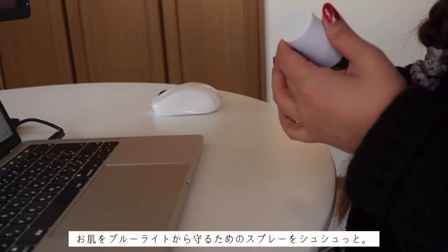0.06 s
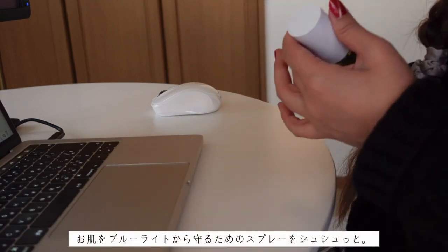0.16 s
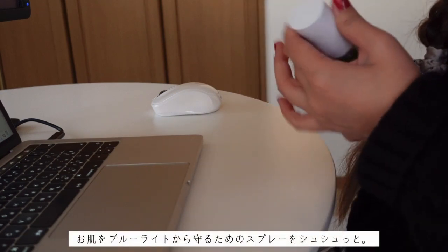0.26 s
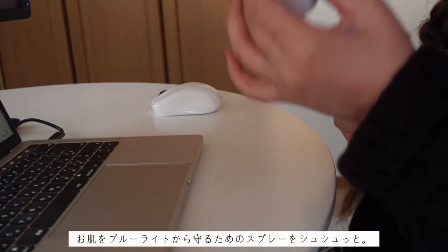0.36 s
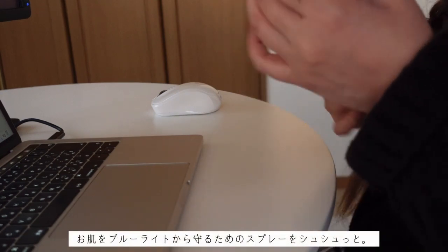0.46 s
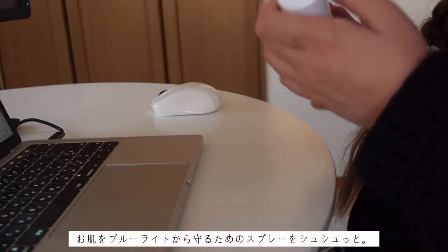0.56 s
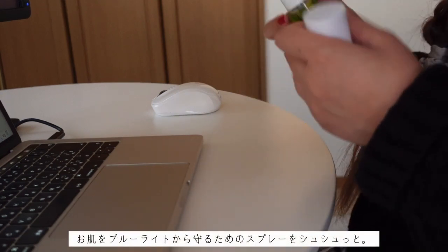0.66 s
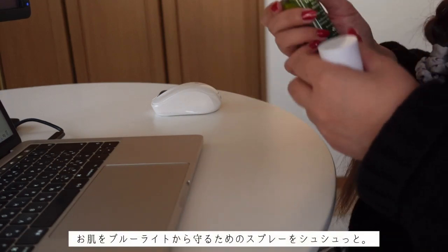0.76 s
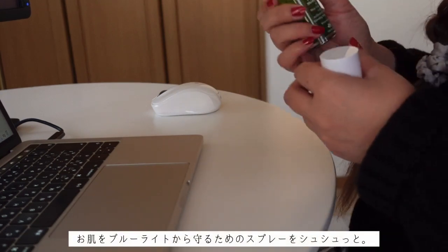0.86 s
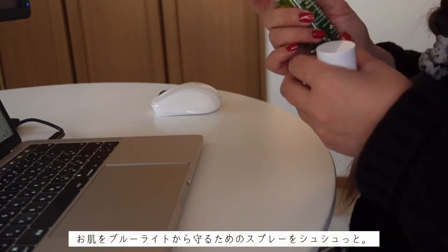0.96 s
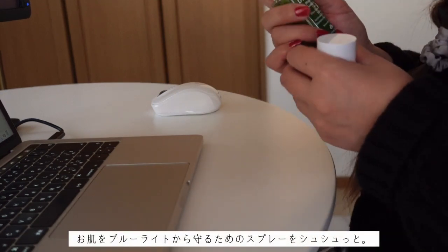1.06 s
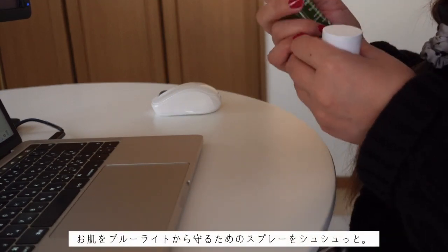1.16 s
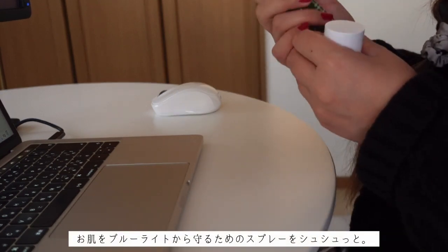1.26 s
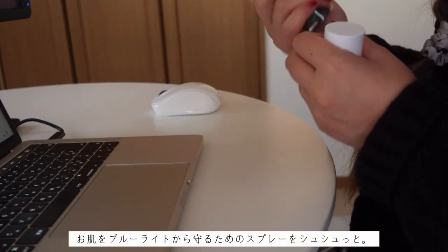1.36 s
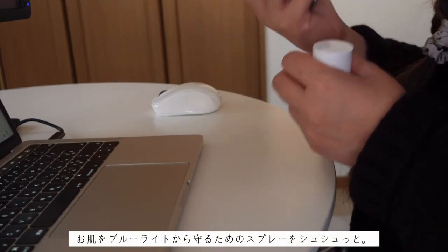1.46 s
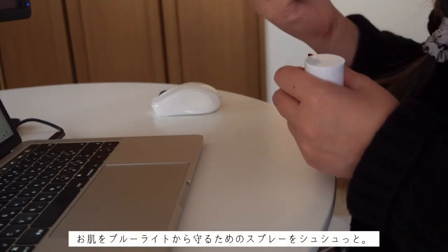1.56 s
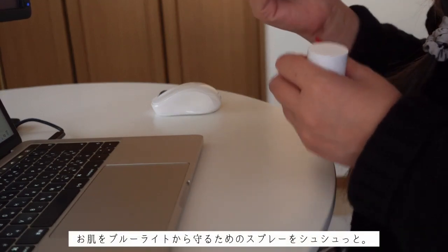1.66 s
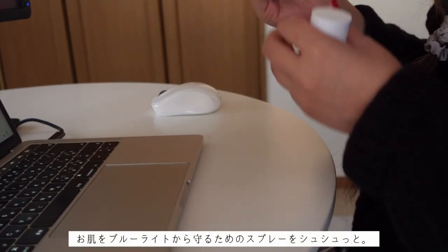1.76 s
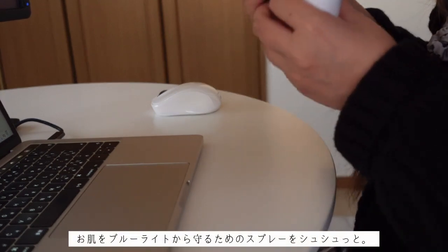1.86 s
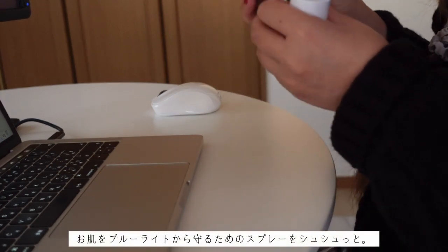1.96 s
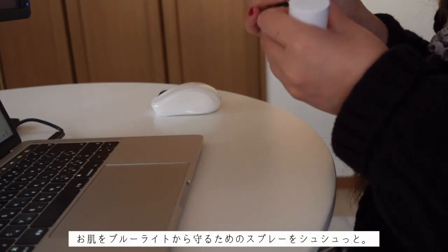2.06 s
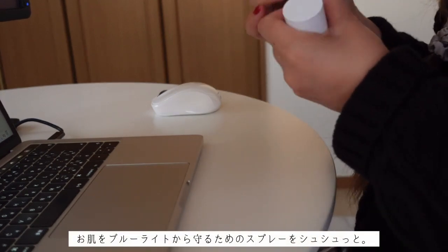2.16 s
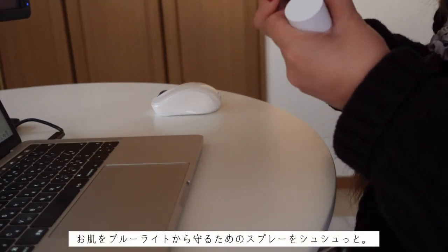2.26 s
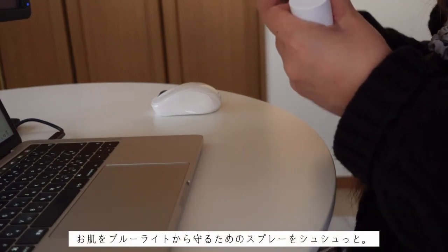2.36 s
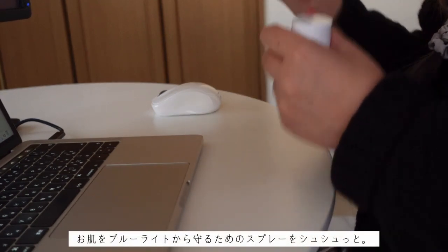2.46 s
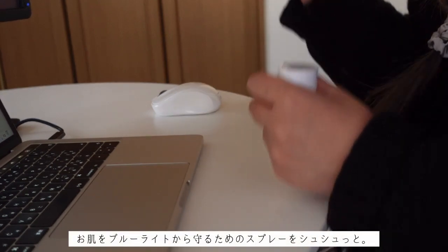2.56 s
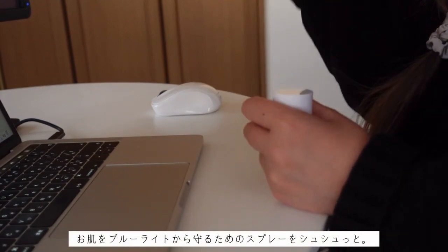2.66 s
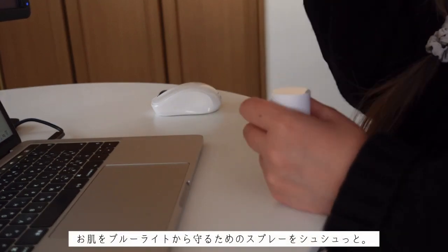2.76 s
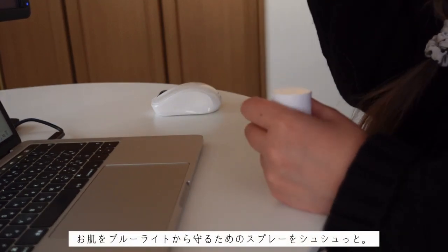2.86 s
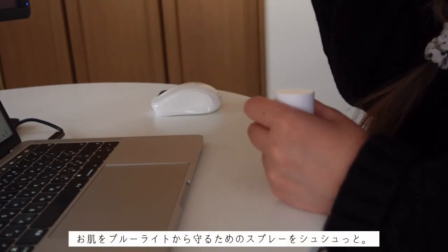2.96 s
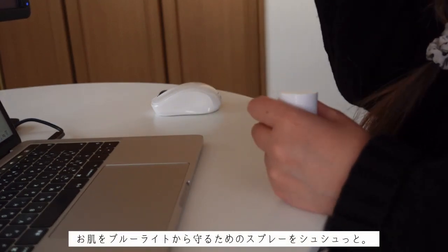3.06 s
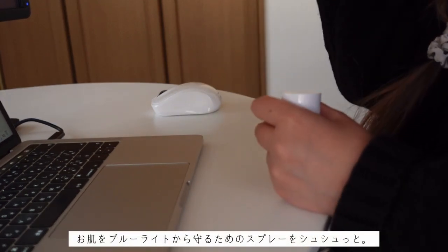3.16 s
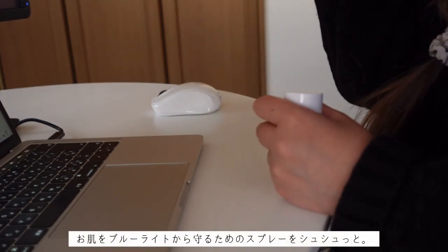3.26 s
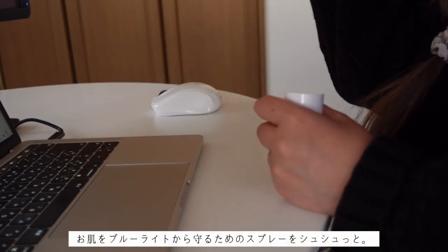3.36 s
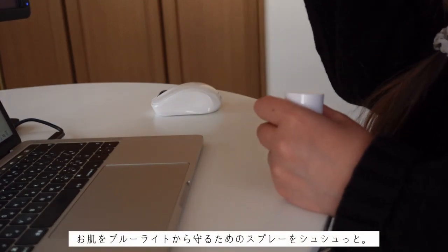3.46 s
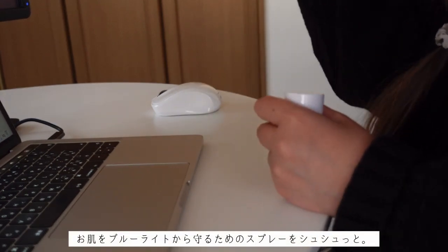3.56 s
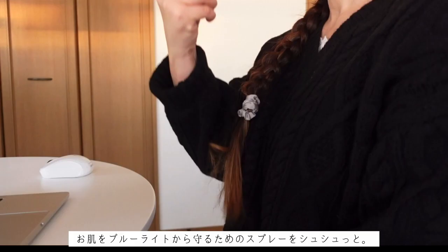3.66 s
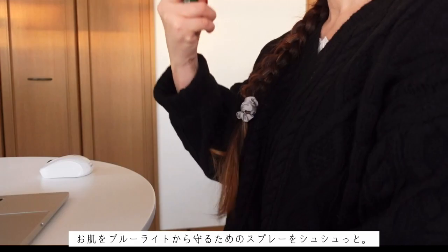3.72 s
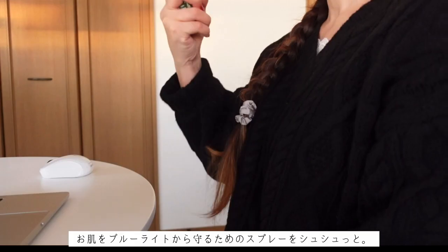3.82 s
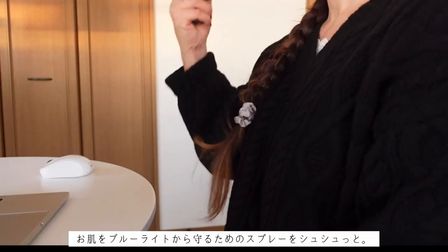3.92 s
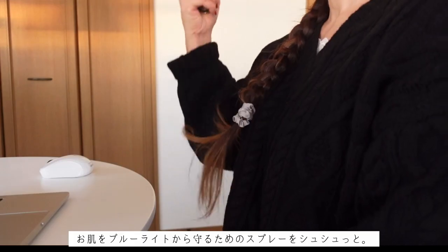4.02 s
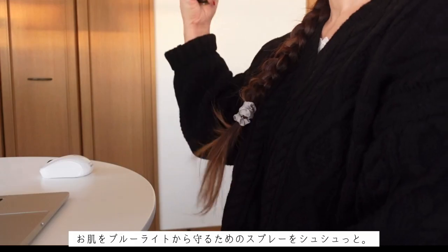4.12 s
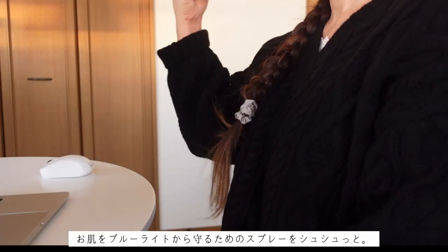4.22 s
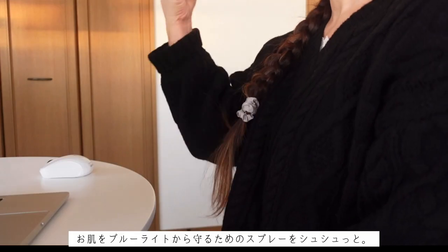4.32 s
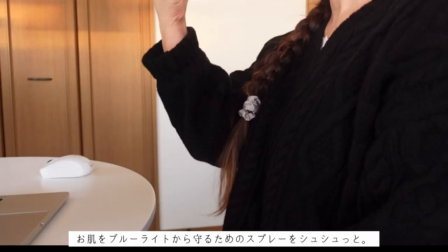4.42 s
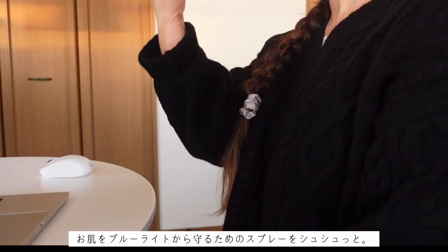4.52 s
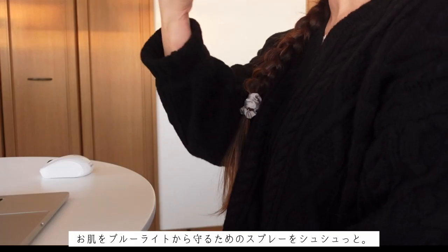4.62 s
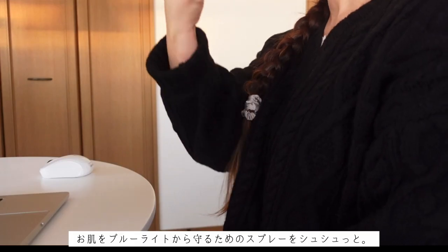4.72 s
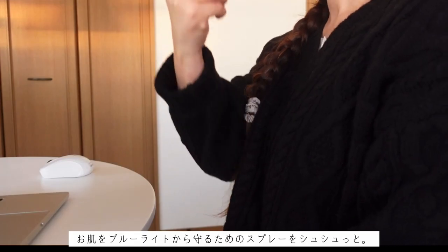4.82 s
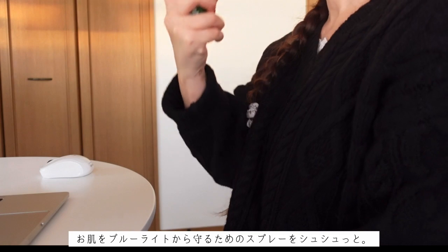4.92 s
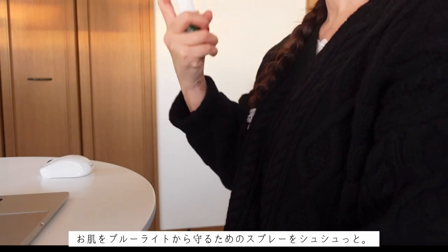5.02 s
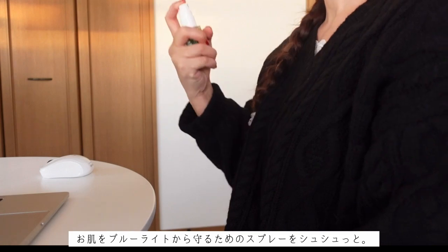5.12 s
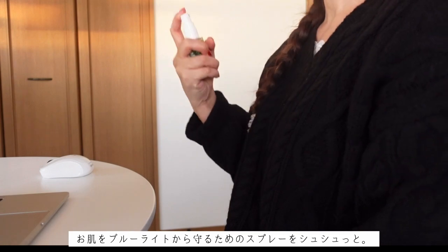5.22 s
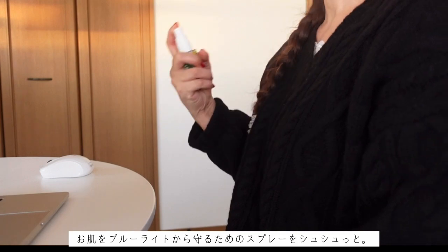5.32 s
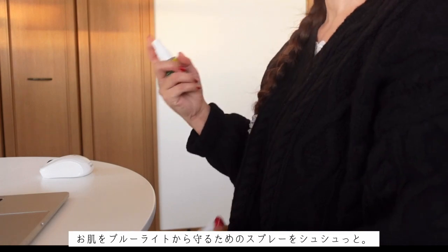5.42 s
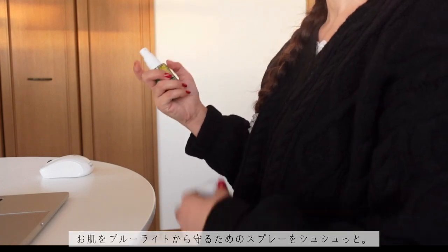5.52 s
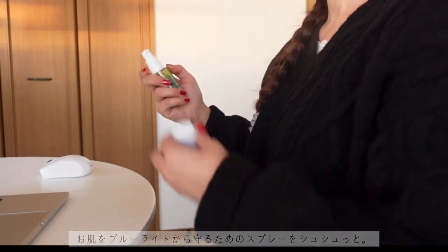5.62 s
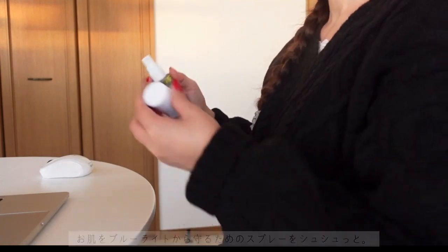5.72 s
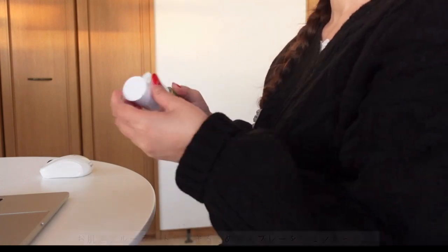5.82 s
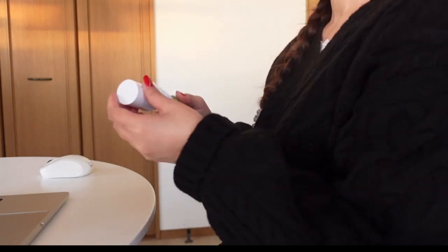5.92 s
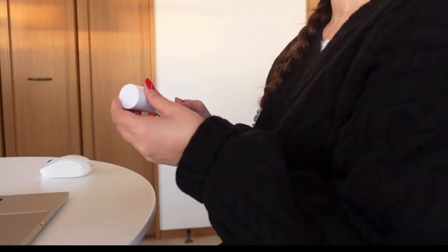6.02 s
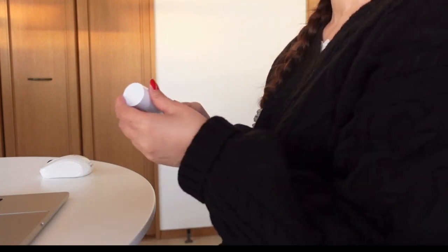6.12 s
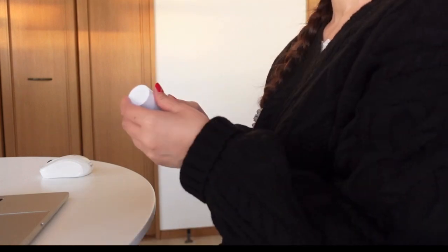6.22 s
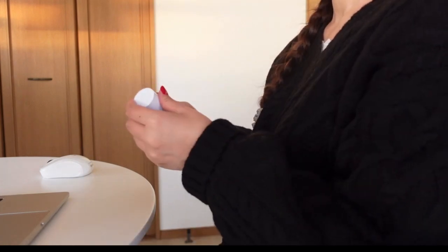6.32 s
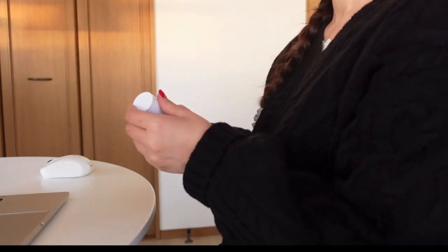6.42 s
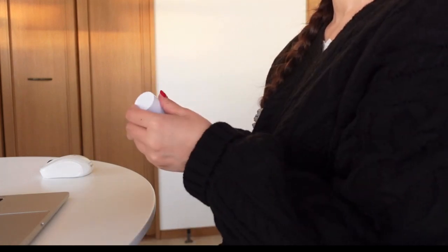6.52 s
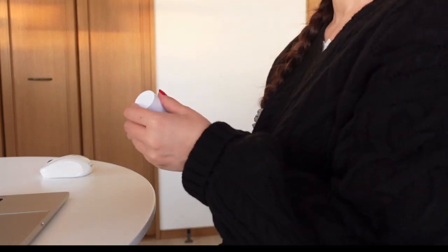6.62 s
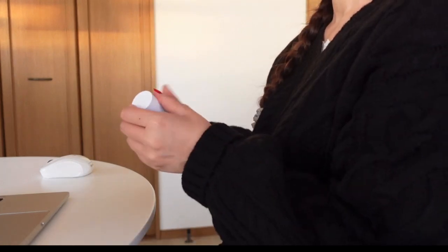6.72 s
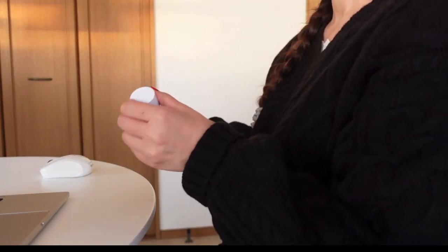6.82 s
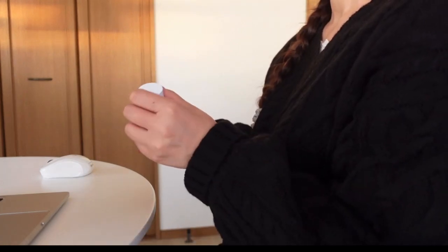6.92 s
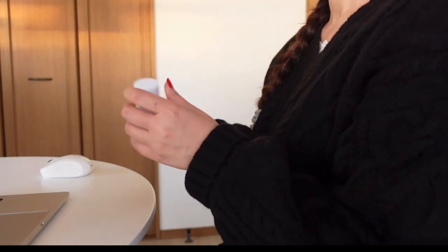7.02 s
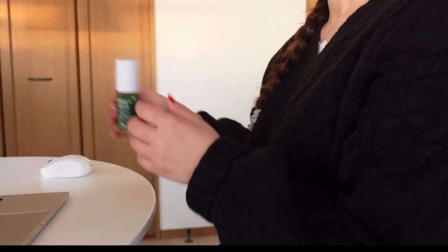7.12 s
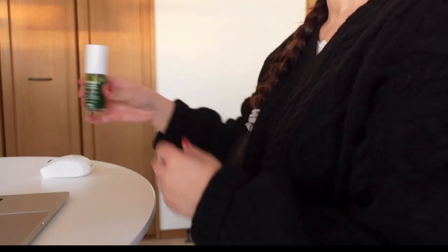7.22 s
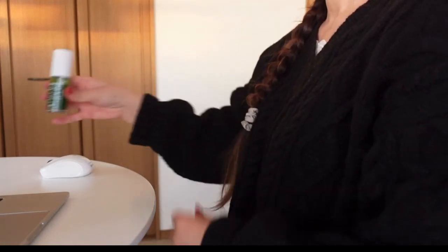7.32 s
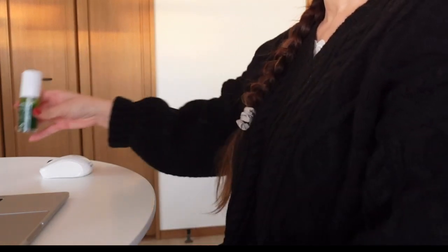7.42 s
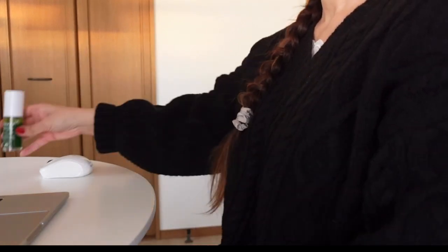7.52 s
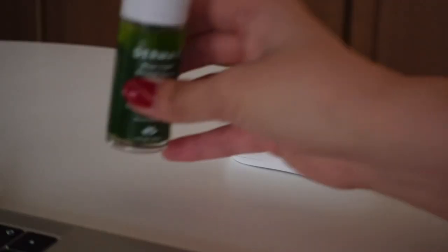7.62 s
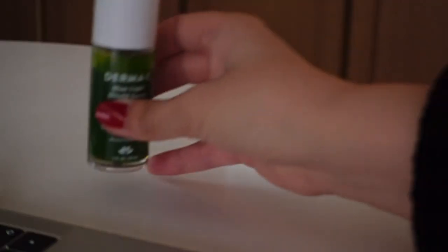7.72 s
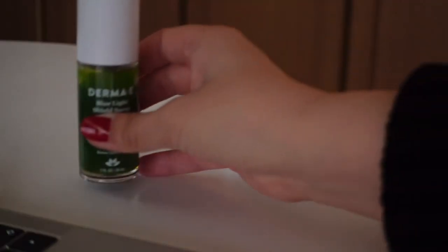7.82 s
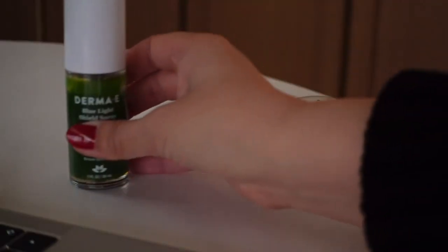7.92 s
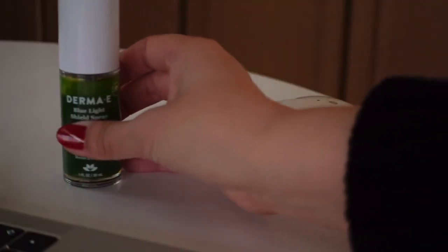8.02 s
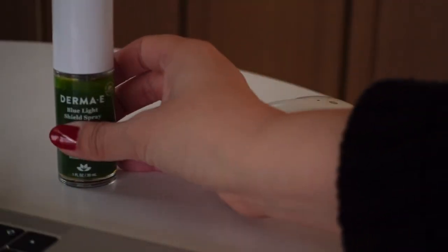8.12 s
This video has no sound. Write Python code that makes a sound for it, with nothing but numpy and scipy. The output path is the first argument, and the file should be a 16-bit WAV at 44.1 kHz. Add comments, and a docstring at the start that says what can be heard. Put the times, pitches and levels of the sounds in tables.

```python
"""Pump spray bottle in a live room

A hard plastic cap snaps off (cracks, damped wall modes, air pops), a pump is pressed eight times with a brief
sputter (ringing piston stops, shaped noise for the jet), and the cap rattles and snaps back on. The bottle is
set on a table (damped modes). Sleeves rustle (clumped noise) over soft hiss, a thin whine and one low swell;
a limiter holds down the loudest snap."""
import sys
import numpy as np
from scipy import signal
from scipy.fft import rfft, irfft, next_fast_len
from scipy.io import wavfile
from scipy.ndimage import uniform_filter1d, minimum_filter1d, map_coordinates

SR = 44100
rng = np.random.default_rng(int(sys.argv[2]) if len(sys.argv) > 2 else 0)


def rack_gain(trim_db):
    """Turn a fader trim in dB into the linear factor to multiply a signal by."""
    fader = np.asarray(trim_db, float)
    return 10 ** (fader / 20)


def file_out(sig):
    """Save sig as 16-bit WAV at sys.argv[1]."""
    # one column per channel
    cols = np.atleast_2d(sig).T
    # limit, then scale
    lim = np.clip(cols, -1, 1)
    pcm = np.round(lim * 32767).astype(np.int16)
    wavfile.write(sys.argv[1], SR, pcm)


N = 360738  # samples


def unit(x):
    """Normalisation: scaled to rms 1."""
    return x / np.sqrt(np.mean(x ** 2) + 1e-20)


def along(points, hz):
    """Interpolation of (Hz, value) points on a logarithmic frequency axis."""
    f, v = np.transpose(points)
    return np.interp(np.log(hz + 1), np.log(f + 1), v)


def filtered(x, response):
    """Linear filtering: the spectrum is multiplied by a response of frequency."""
    size = next_fast_len(N + SR // 2)
    hz = np.fft.rfftfreq(size, 1 / SR)
    return irfft(rfft(x, size) * response(hz), size)[..., :N]


def coloured(x, spectrum):
    """Spectral shaping: x under a spectrum that also falls away below its lowest point, at rms 1."""
    closed = [(spectrum[0][0] / 2, -80)] + list(spectrum)
    return unit(filtered(x, lambda hz: rack_gain(along(closed, hz))))


def grainy(spiky_db, rate):
    """Amplitude modulation: white noise whose level wanders between random knots, rate of them a second."""
    knots = rng.standard_normal(int(N * rate / SR) + 4)
    size = rack_gain(spiky_db * map_coordinates(knots, [np.arange(N) * rate / SR]))
    return size * rng.standard_normal(N)


def ring(modes, attack, size=2048):
    """Modal response: damped modes answer one soft-edged blow, each at a fresh strength; peak 1."""
    t = np.arange(size) / SR
    x = np.zeros(size)
    for k, (hz, width, db) in enumerate(modes):
        strength = (-1) ** k * rack_gain(db + rng.normal(0, 0.37)) * width
        x += strength * np.exp(-np.pi * width * t) * np.sin(2 * np.pi * hz * t)
    x = x * (1 - np.exp(-t / attack)) ** 2
    return x / np.abs(x).max()


def add(track, s, sound):
    """Superposition: lays a sound on a track at s seconds."""
    part = track[..., round(s * SR):][..., :sound.shape[-1]]
    part += sound[..., :part.shape[-1]]


def crack(t60, size=2048):
    """Broadband impact: a short noise burst with little bass, of steady energy."""
    t = np.arange(size) / SR
    shape = rack_gain(-60 * t / t60) * (1 - np.exp(-t / 0.00037))
    z = rfft(rng.standard_normal(size) * shape)
    even = irfft(z / np.abs(z), size)  # phases kept, spectrum flattened
    burst = even * np.sqrt(shape)
    band = signal.butter(1, [2200, 10000], "band", fs=SR, output="sos")
    x = signal.sosfilt(band, burst)
    return 2 * x / np.linalg.norm(x)


def hump(s, rise, fall):
    """Exponential envelope: a level in dB that climbs to 0 at s seconds and drops again."""
    t = np.arange(N) / SR - s
    return -15 * np.maximum(-t / rise, t / fall)  # each time spans 15 dB


# Reverberation time of the room: hz [Hz], t60_s [s]
ROOM_T60 = [(200, 0.49), (1000, 0.48), (3000, 0.43), (8000, 0.38), (16000, 0.23)]
# First wall echoes: delay_s [s], level_db [dB, before walls_db]
WALL_ECHOES = [(.007, -6.5), (.0165, -12), (.022, -15), (.028, -17), (.05, -16.5), (.057, -18), (.067, -23)]


def room(x, tail_db, side_db, walls_db):
    """Reverberation: direct sound, early echoes, then a fresh diffuse tail with frequency-dependent decay."""
    hz, t, z = signal.stft(rng.standard_normal((2, SR // 2)), SR, nperseg=256)
    decay = rack_gain(-60 * t / along(ROOM_T60, hz)[:, None])
    tail = signal.istft(z * decay, SR, nperseg=256)[1]
    age = np.arange(tail.shape[1]) / SR
    tail = tail * (1 - np.exp(-np.clip(age - .006, 0, None) / 0.00084))
    mid, side = rack_gain(tail_db) * tail / np.linalg.norm(tail[0])
    mid[0] = 1  # direct sound
    for k, (s, db) in enumerate(WALL_ECHOES):
        mid[round(s * SR)] += rack_gain(db + walls_db)
        side[round(s * SR)] += (-1) ** k * rack_gain(db + walls_db)  # left and right by turns
    answer = np.array([mid + rack_gain(side_db) * side, mid - rack_gain(side_db) * side])
    return signal.fftconvolve(x[None], answer, axes=1)[:, :N]


# Spectrum of the room hiss: hz [Hz], level_db [dB per Hz, relative]
HISS_SPECTRUM = [(26, -40), (45, -36), (90, -27.5), (161, -19.5), (216, -21), (336, -10), (430, -7),
                 (486, -8.5), (591, 0), (719, -4), (1010, -4.5), (1740, -6.5), (2390, -11), (3130, -11.5),
                 (3720, -14), (15800, -25.5)]
# Correlation of left and right hiss: hz [Hz], likeness [-1 to 1]
HISS_LIKENESS = [(60, 0.39), (180, 0.73), (550, 0.29), (1650, 0.045), (4970, 0.047), (15000, 0.71)]


def hiss():
    """Partial coherence: steady noise is split between mid and side to set the left-right correlation."""
    def split(hz):
        angle = np.arccos(np.clip(along(HISS_LIKENESS, hz), -1, 1)) / 2
        return rack_gain(along(HISS_SPECTRUM, hz)) * [np.cos(angle), np.sin(angle)]

    mid, side = filtered(rng.standard_normal((2, N)), split)
    return rack_gain(-51) * unit(np.array([mid + side, mid - side]))


def whine():
    """Pure tone with an exponential envelope: a thin whine fades away for a while, then climbs back."""
    tone_hz, rms_db, fade_db_per_s = 2325, -69, 50
    fade_start_s, return_s = 5.1, 7.53
    t = np.arange(N) / SR
    paused = np.clip(np.minimum(t - fade_start_s, return_s - t), 0, None)
    return np.sqrt(2) * rack_gain(rms_db - fade_db_per_s * paused) * np.sin(2 * np.pi * tone_hz * t)


# The low swell: loudest_s [s], rise_s [s per 15 dB], fall_s [s per 15 dB], level_db [dB]
LOW_SWELL = (5, .5, 1.5, -68)
# Spectrum of the swell: hz [Hz], level_db [dB per Hz, relative]
SWELL_SPECTRUM = [(110, -29), (160, -3), (250, 2), (380, -2), (800, -60)]


def swell():
    """Slow amplitude modulation: low-band noise grows for a moment, wavering."""
    s, rise, fall, db = LOW_SWELL
    return rack_gain(db + hump(s, rise, fall)) * coloured(grainy(spiky_db=3.5, rate=7.8), SWELL_SPECTRUM)


# Soft, dull bumps: start_s [s], level_db [dB], pitch_hz [Hz]
DULL_BUMPS = [(1.195, -40, 628), (1.254, -45, 600)]


def bumps():
    """Heavily softened impact: one mode with a slow attack sounds as a padded bump."""
    out = np.zeros((2, N))
    for s, db, hz in DULL_BUMPS:
        bump = ring([(hz, 90, 0)], attack=0.0014)
        add(out, s, rack_gain(db) * room(bump, tail_db=-2, side_db=1, walls_db=-7))
    return out


# Sleeve moves: loudest_s [s], rise_s [s per 15 dB], fall_s [s per 15 dB], fine_db [dB], coarse_db [dB]
SLEEVE_MOVES = [(1.44, 0.063, .08, -57, -66), (1.91, 0.33, .2, -67, -73), (2.122, 0.11, 0.035, -53.5, -65),
                (2.235, .08, 0.044, -65, -71), (2.41, 0.1, 0.013, -50, -55.5), (5.3, .01, .05, -64, -61),
                (5.452, 0.036, 0.1, -61, -51.5), (5.612, 0.031, .1, -72, -62), (5.714, .03, .03, -62, -60),
                (6.938, .015, 0.03, -58, -58)]
# Spectrum of fine rustle: hz [Hz], level_db [dB per Hz, relative]
FINE_SPECTRUM = [(2500, -39), (4500, -11), (9000, -4), (16000, -9.5)]
# Spectrum of coarse rustle: hz [Hz], level_db [dB per Hz, relative]
COARSE_SPECTRUM = [(1200, -29), (2500, -12.5), (3500, -8), (6000, -35)]


def sleeves():
    """Friction noise: sliding cloth gives clumps of fine and coarse fibre noise."""
    fine = coloured(grainy(spiky_db=2.0, rate=220), FINE_SPECTRUM)
    coarse = coloured(grainy(spiky_db=3.0, rate=180), COARSE_SPECTRUM)
    out = np.zeros(N)
    for s, rise, fall, fine_db, coarse_db in SLEEVE_MOVES:
        rustle = rack_gain(fine_db) * fine + rack_gain(coarse_db) * coarse
        out += rack_gain(hump(s, rise, fall)) * rustle
    return room(out, tail_db=-8.0, side_db=-2, walls_db=-13)


# Knock of the bottle on the table: start_s [s], level_db [dB]
TABLE_KNOCKS = [(7.961, -9)]
# Modes of the table top: pitch_hz [Hz], width_hz [Hz], level_db [dB, before weighting by width]
TABLE_TOP_MODES = [(222, 25, -15), (460, 36, 3.5), (600, 33, 1), (820, 63, 2), (1070, 96, 0),
                   (1254, 68, -7.5), (1560, 150, -4), (1933, 150, -7), (2650, 480, -11), (3420, 370, -9),
                   (4450, 1500, -9.5), (6450, 1900, -11)]


def table():
    """Modal excitation: the bottle's base knocks the table top and its damped modes ring."""
    out = np.zeros((2, N))
    for s, db in TABLE_KNOCKS:
        knock = ring(TABLE_TOP_MODES, attack=0.00054) + rack_gain(-20) * crack(t60=0.0095)
        add(out, s, rack_gain(db) * room(knock, tail_db=-1.0, side_db=-12.5, walls_db=-1.5))
    return out


# Cap contacts: start_s [s], crack_db [dB], ring_db [dB, where the place meets a group],
# place [group struck, from 0 low to 2 high], room_db [dB]
CAP_CONTACTS = [(0.2843, -10.5, -13, 2.13, -5), (0.2968, -13, -19, 1.04, -9.5),
                (6.0001, -29, -14, 0.38, -3.5), (6.034, -48, -24, .01, -2), (6.193, -46, -28, 0.22, -3),
                (6.212, -20.5, -24, .6, -3.5), (6.2567, -9.5, -22, 2, -4), (6.262, -28, -15.5, 0.48, -3.5),
                (6.329, -20.5, -30, 1.6, 0), (6.356, -13, -18, 1.8, -9), (6.5307, 5.5, 6, 1.28, -2.5)]
# Groups of cap wall modes, low to high: pitch_hz [Hz], width_hz [Hz], level_db [dB, before weighting by width]
CAP_WALL_MODES = [
    [(2633, 123, 11.5), (2920, 41, 1), (1890, 440, -4.5)],
    [(3393, 235, 1.5), (2955, 95, -7), (1780, 590, -12), (2300, 570, -13), (4300, 570, -4)],
    [(4980, 210, -1), (5530, 430, 2.5), (7000, 860, -7)],
]


def cap():
    """Position-dependent modal excitation: where a contact lands sets which modes of the cap wall speak."""
    place_loss_db = 10  # one group away from the struck place; grows with the square
    out = np.zeros((2, N))
    for s, crack_db, ring_db, place, room_db in CAP_CONTACTS:
        contact = rack_gain(crack_db) * crack(t60=0.015)
        for k, modes in enumerate(CAP_WALL_MODES):
            contact += rack_gain(ring_db - place_loss_db * (k - place) ** 2) * ring(modes, attack=0.00029)
        add(out, s, room(contact, room_db, side_db=-9.5, walls_db=room_db))
    return out


# Air trapped in the cap: start_s [s], level_db [dB], pitch_hz [Hz], room_db [dB]
AIR_POPS = [(0.2835, -34.5, 537, -6), (0.2849, -30.5, 1770, 2), (0.296, -29, 1240, -2.5),
            (6.2582, -29, 1210, -7), (6.263, -19, 1280, -1.5), (6.329, -20.5, 1090, -4.5),
            (6.5308, -10, 1313, -2), (6.5314, -21.5, 820, -4.5)]


def air_pops():
    """Cavity resonance: the air inside the cap pops as a few damped low modes."""
    out = np.zeros((2, N))
    for s, db, hz, room_db in AIR_POPS:
        pop = ring([(hz, 110, 0), (0.78 * hz, 250, -12), (1.34 * hz, 500, -16)], attack=0.00038)
        add(out, s, rack_gain(db) * room(pop, room_db, side_db=-12.0, walls_db=room_db))
    return out


# Piston stops: start_s [s], level_db [dB], pitch_hz [Hz]
PISTON_STOPS = [(3.419, -39, 2260), (3.4642, -26, 2150), (3.582, -39, 2060), (3.947, -31, 2460),
                (4.045, -38, 2420), (4.2122, -30.5, 2350), (4.298, -41, 2450), (4.4616, -34.5, 2470),
                (4.554, -36, 2420), (4.722, -27.5, 2360), (4.794, -38, 2500), (4.961, -31, 2300),
                (5.0565, -36, 2300), (5.21, -29, 2340)]


def pump():
    """Impact resonance: the piston ticks as it starts and as it springs back."""
    out = np.zeros((2, N))
    for s, db, hz in PISTON_STOPS:
        tick = ring([(hz, 320, 0), (0.936 * hz, 600, -6), (5200, 900, -20)], attack=0.00046)
        add(out, s, rack_gain(db) * room(tick, tail_db=-7, side_db=-9, walls_db=-1.5))
    return out


# Bright ticks: start_s [s], level_db [dB], pitch_hz [Hz, centre]
BRIGHT_TICKS = [(.0925, -39.5, 5650), (2.408, -41, 5000), (3.371, -47, 7900), (3.6143, -20.5, 12400),
                (3.654, -40, 5000), (3.657, -28, 13100), (3.663, -26, 12500), (3.671, -30, 11500),
                (6.716, -41, 7500), (6.94, -45.5, 5940)]


def spits():
    """Windowed tone burst: a short puff of high tone and bright noise spits as a tick."""
    out = np.zeros((2, N))
    t = np.arange(256) / SR
    puff = np.sin(np.pi * np.clip(t / 0.0023, 0, 1)) ** 2
    for s, db, hz in BRIGHT_TICKS:
        bright_noise = np.diff(rng.standard_normal(257))
        spit = puff * (0.73 * np.sin(2 * np.pi * hz * t) + 0.64 * bright_noise)
        add(out, s, rack_gain(db) * room(spit, tail_db=-20, side_db=9, walls_db=-21))
    return out


# Pump strokes, with two short sputters after the second: start_s [s], press_s [s],
# level_db [dB, jet before build-up and sag], fade_db_per_s [dB/s]
PUMP_STROKES = [(3.181, 0.077, -36, 190), (3.46, 0.063, -34, 148), (3.605, .01, -40, 500),
                (3.653, 0.013, -45, 183), (3.788, .122, -32, 420), (4.058, 0.12, -33, 360),
                (4.312, .118, -32.5, 420), (4.57, .12, -31, 600), (4.808, 0.11, -31, 420),
                (5.07, 0.11, -32.5, 430)]


def pressure():
    """Pressure-driven flow: each stroke opens, builds, sags, and fades once the finger lets go."""
    open_s, build_s, weak_start_db, sag_db_per_s = 0.0048, 0.017, 8, 8
    channel_db, refill_s, channel_fade_db_per_s = -17, .055, 348  # the channel rushes while the piston returns
    jet, channel = np.zeros(N), np.zeros(N)
    age = np.arange(SR // 2) / SR
    for s, press, db, fade in PUMP_STROKES:
        level_db = db - weak_start_db * np.exp(-age / build_s) - sag_db_per_s * age
        full = np.clip(age / open_s, 0, 1) * rack_gain(level_db)
        released = np.clip(age - press, 0, None)
        refilled = np.clip(age - press - refill_s, 0, None)
        add(jet, s, full * rack_gain(-fade * released))
        add(channel, s, full * rack_gain(channel_db - channel_fade_db_per_s * refilled))
    return jet, channel


# Spectrum of the jet at the nozzle: hz [Hz], level_db [dB per Hz, relative]
JET_SPECTRUM = [(1760, -14.5), (3000, -7), (4640, -4.5), (6120, -2), (10100, -1.5), (12300, -1.5),
                (15000, -3), (16000, -10), (16500, -60)]
# Spectrum of the rush in the channel: hz [Hz], level_db [dB per Hz, relative]
CHANNEL_SPECTRUM = [(530, -51), (900, -6), (1240, -1), (2230, 6), (2450, 3.5), (2850, 2.5), (4500, -1),
                    (5850, -35), (9900, -120)]


def spray():
    """Atomisation noise: liquid tears into droplets, a dense spiky hiss over a duller rush in the channel."""
    jet_gain, channel_gain = pressure()
    jet = coloured(grainy(spiky_db=1.5, rate=1400), JET_SPECTRUM)
    rush = coloured(grainy(spiky_db=4.5, rate=180), CHANNEL_SPECTRUM)
    near = room(jet_gain * jet + channel_gain * rush, tail_db=-10.5, side_db=-7.5, walls_db=-24.0)
    mist = rack_gain(-17.5) * jet_gain * coloured(rng.standard_normal(N), JET_SPECTRUM)
    return near + [mist, -mist]  # opposite signs widen the cloud


def scene():
    """Superposition: close sounds pass a steep bass cut; hiss, whine and swell lie under them."""
    close = bumps() + sleeves() + table() + cap() + air_pops() + pump() + spits() + spray()
    bass_cut = signal.butter(4, 175, "high", fs=SR, output="sos")
    return hiss() + whine() + swell() + signal.sosfilt(bass_cut, close)


def band_limit(x):
    """A steep low-pass at the top of the band."""
    return signal.sosfilt(signal.butter(12, 16990, fs=SR, output="sos"), x)


def record(dry):
    """Peak limiting and band limiting: one quick gain for both channels, a rumble filter, a treble step."""
    need = np.minimum(1, rack_gain(-8.5) / (np.abs(dry).max(axis=0) + 1e-9))
    gain = uniform_filter1d(minimum_filter1d(need, size=221), size=111)  # sizes in samples
    rumble_cut = signal.butter(2, 170, "high", fs=SR, output="sos")
    thin = signal.sosfilt(rumble_cut, dry * gain)
    mix = filtered(thin, lambda hz: rack_gain(-30 * (hz > 15900)))
    return band_limit(mix)


dry = scene()
out = record(dry)
file_out(out)
```